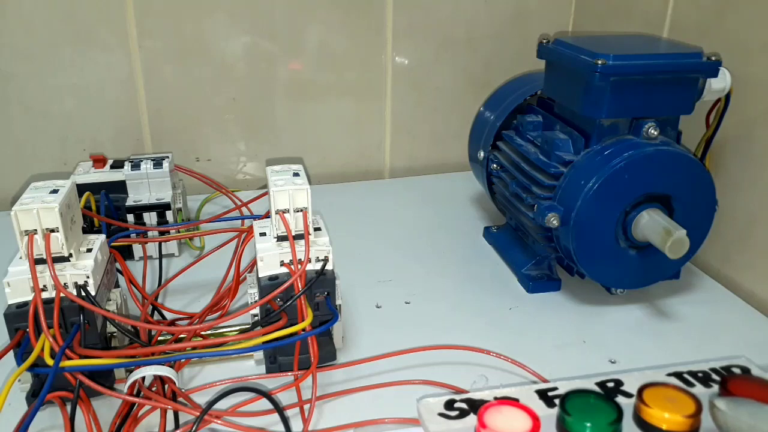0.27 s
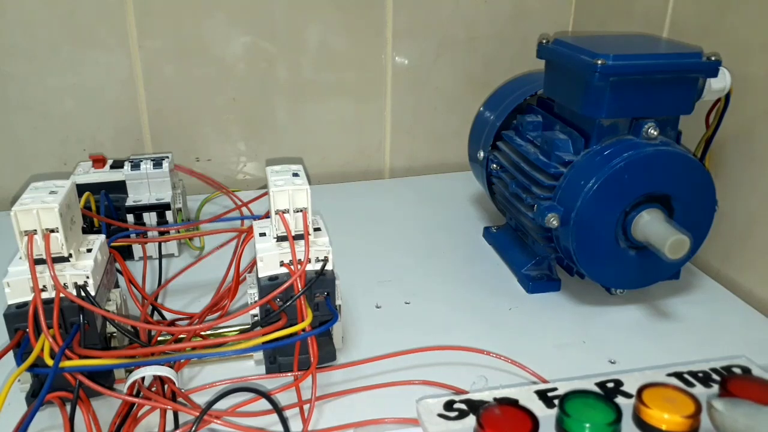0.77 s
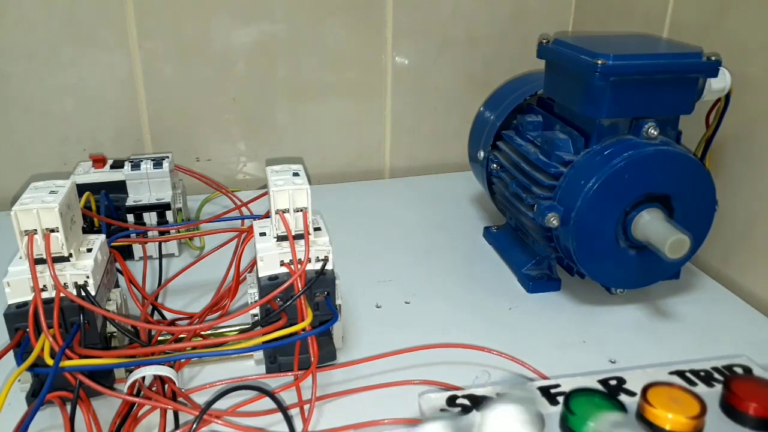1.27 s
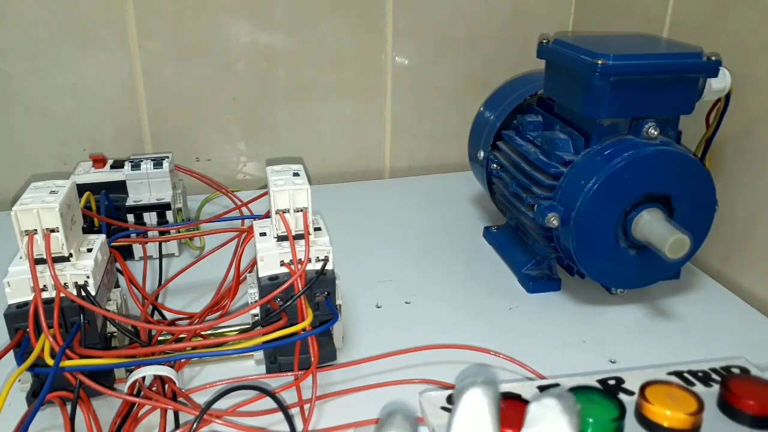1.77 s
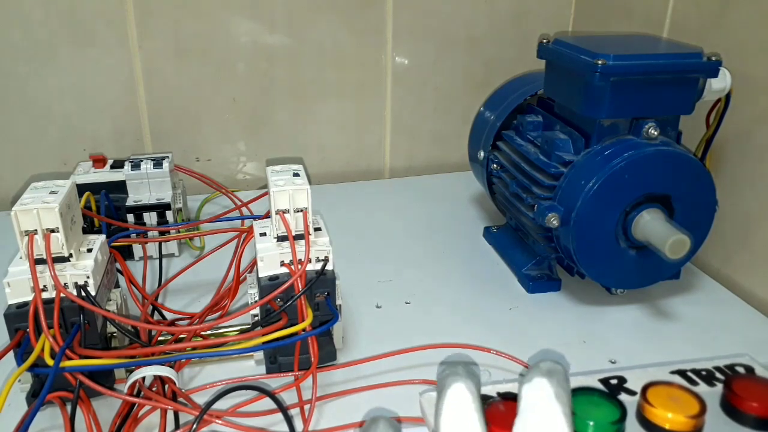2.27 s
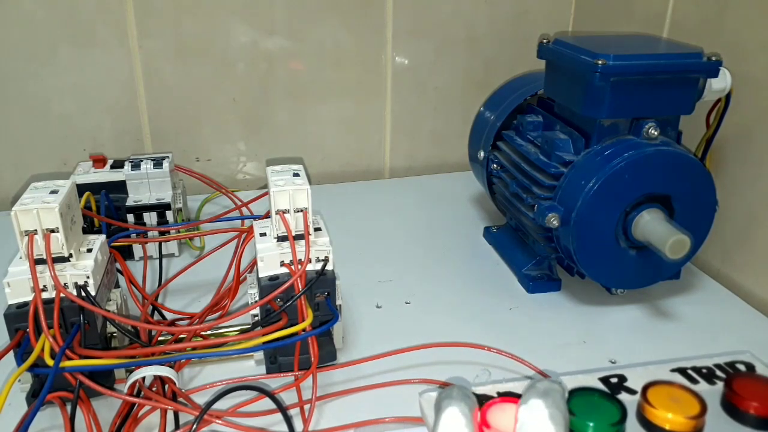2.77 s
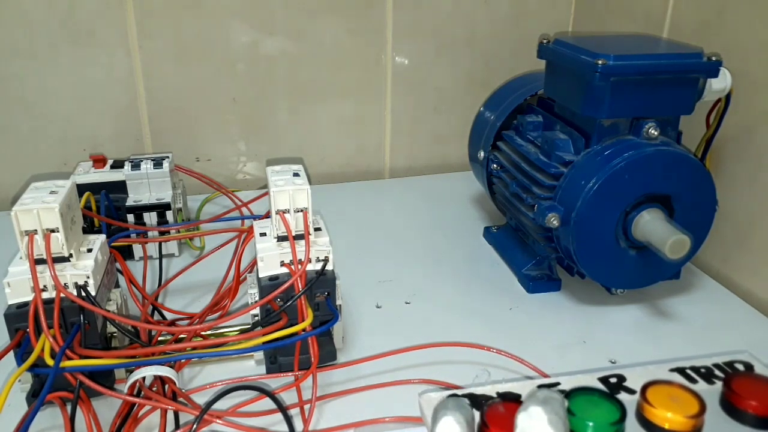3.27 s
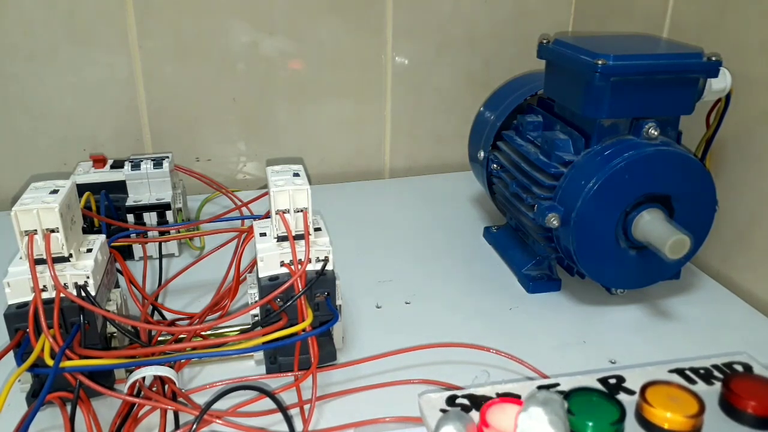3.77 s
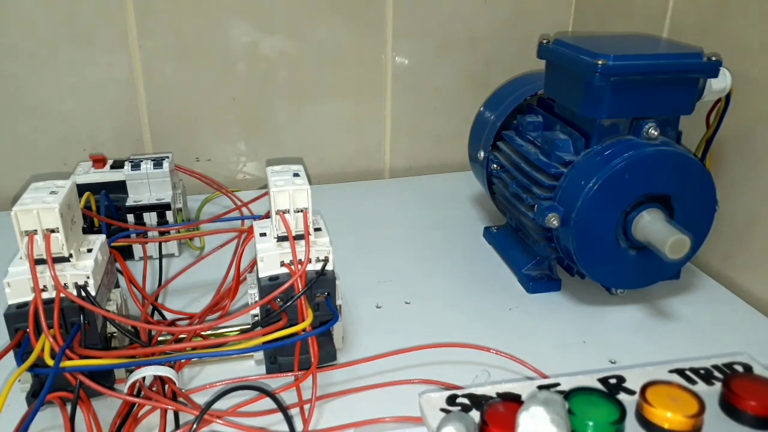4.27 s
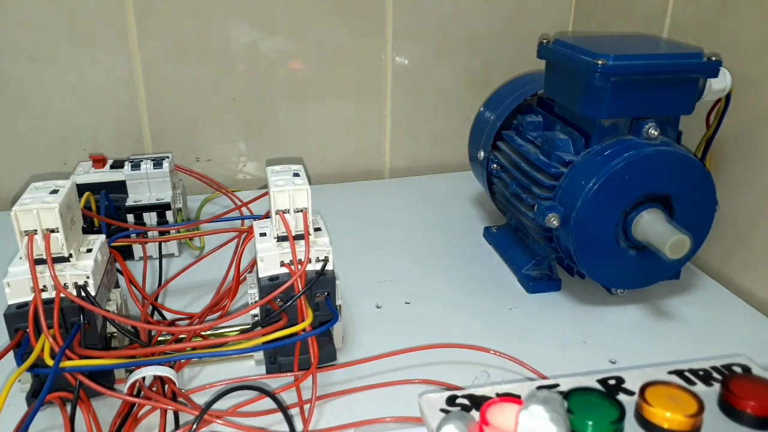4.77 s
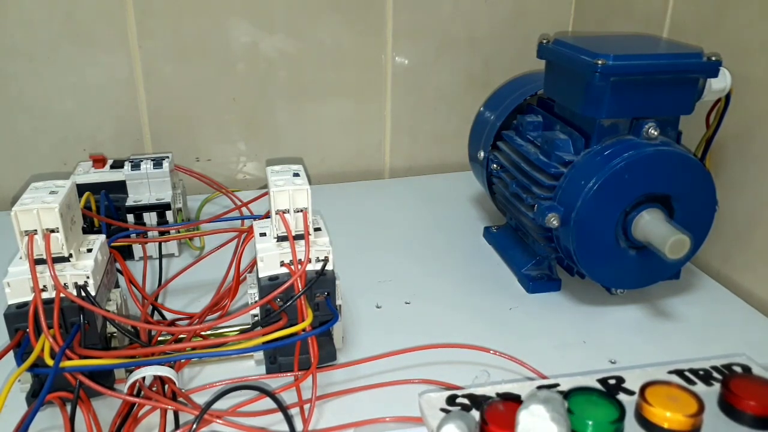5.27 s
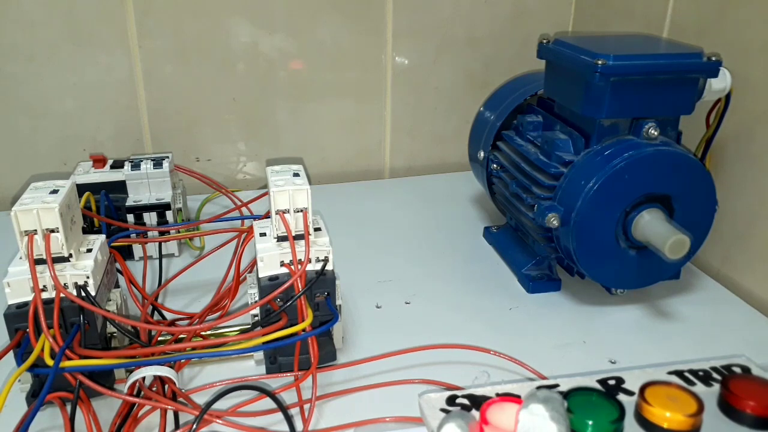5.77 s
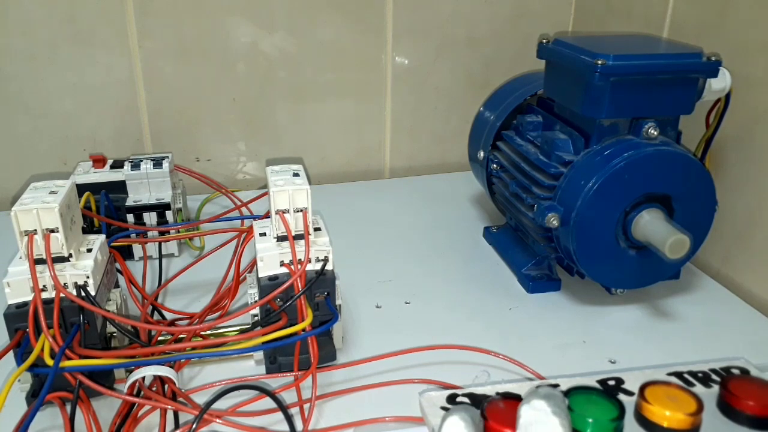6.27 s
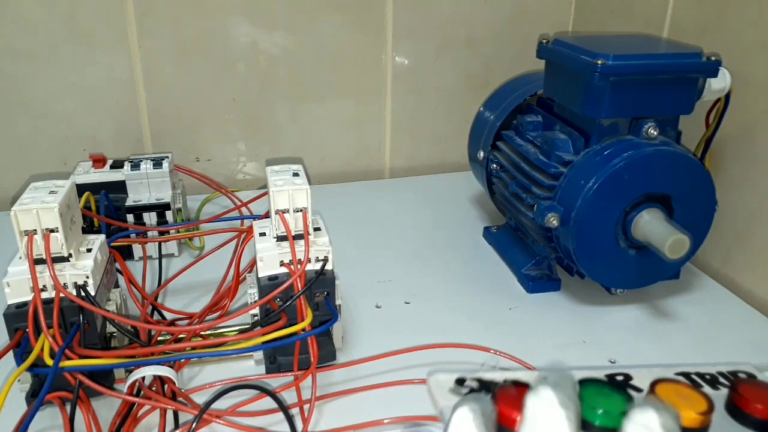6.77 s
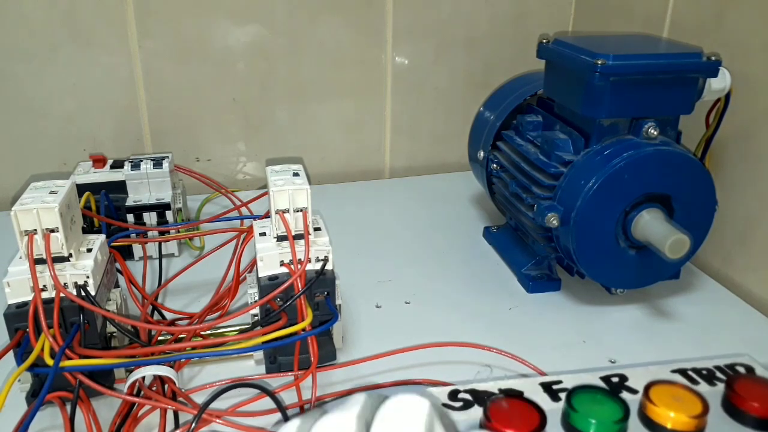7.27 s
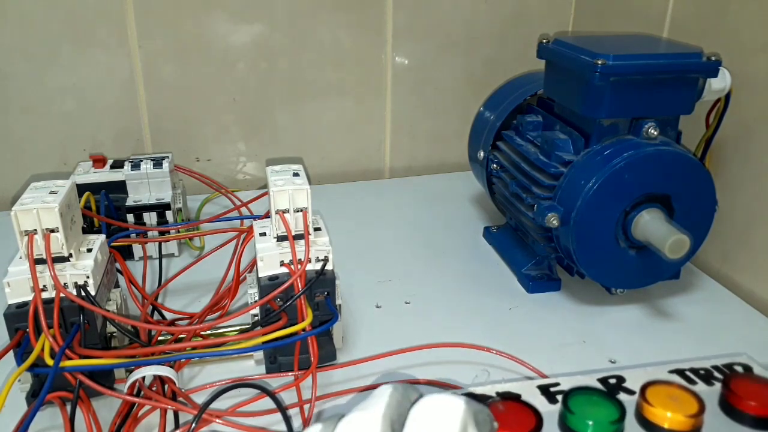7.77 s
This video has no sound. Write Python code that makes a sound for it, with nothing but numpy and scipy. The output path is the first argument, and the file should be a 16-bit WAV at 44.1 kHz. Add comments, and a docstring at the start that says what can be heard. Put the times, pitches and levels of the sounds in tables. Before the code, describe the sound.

Loud steel clacks of a relay switch start and stop a whining motor five times, with booming sheet metal and tiled-room echo.

```python
"""A tiled room hums quietly as a phone microphone fades in on a sheet-metal bench with a contactor and small motor.
First pull-in: steel cracks on steel, the bench booms, and the motor growls and thumps on its feet from rest.
It whines through a long run, with light plastic ticks, until a duller drop-out.
Three short runs follow, each started while the motor still coasts; a fifth start leads to a last long run.
After the final drop-out the coasting motor dies away. Lines, filtered noise and decaying modes make the sounds."""
import sys
import numpy as np
from scipy import signal
from scipy.fft import rfft, irfft
from scipy.io import wavfile
from scipy.ndimage import uniform_filter1d

SR = 44100
rng = np.random.default_rng(int(sys.argv[2]) if len(sys.argv) > 2 else 0)


def wav_out(sig):
    """Save sig, one row per channel (or a flat mono array), as 16-bit PCM at SR to the path in sys.argv[1]."""
    wavfile.write(sys.argv[1], SR, np.round(np.clip(np.atleast_2d(sig).T, -1, 1) * 32767).astype(np.int16))


N = 354078
TIME = np.arange(N) / SR
AGE = np.arange(SR // 2) / SR  # seconds since a blow

# Columns named level_db are relative wherever a function adds its own level.
# Quiet room tone: pitch_hz, level_db
ROOM_COLOUR = [(30, -6), (100, -3.5), (150, -1), (220, -2.5), (350, -5.5), (1000, -6.5), (1400, -12.5),
               (3000, -21), (8000, -32), (15500, -27.5)]
ROOM_DB = -62
# Decay of the tiled room: pitch_hz, t60_s
ROOM_DECAY = [(80, 0.31), (250, 0.37), (700, 0.24), (1500, 0.28), (4000, 0.32), (8000, 0.23), (15000, 0.2)]
# Light plastic ticks: start_s, level_db, pitch_hz, half_width_hz
PLASTIC_TICKS = [(1.052, -42.5, 4500, 3500), (1.736, -49, 12100, 2500), (2.218, -44, 5500, 4000),
                 (6.623, -45, 7000, 4500), (6.674, -46.5, 6000, 4000), (6.953, -48, 4000, 3000),
                 (7.253, -39, 7410, 900), (7.729, -51, 11010, 700)]

# Magnet closes: start_s, force_db, bench_boom_db, pole_zing_db
PULL_INS = [(0.7682, -.5, -16, -17.5), (3.1607, .3, -10.8, -25), (4.1860, .3, -13, -21),
            (5.0655, .8, -9, -38), (6.0293, -1.4, -12.5, -16.5)]
# Spring throws the armature back on its stop: start_s, crack_db, spring_ring_db
DROP_OUTS = [(2.8250, -12, -29.5), (3.6521, -10, -31.5), (4.6204, -13, -28.5), (5.5604, -11.5, -30.5),
             (7.8690, -12.5, -31.5)]

# Bearings and fan while fed: pitch_hz, level_db
FED_COLOUR = [(40, -22), (110, -5.5), (200, -11), (370, -5), (500, -7.5), (850, -6.5), (1200, -1),
              (1450, -7.5), (1950, -9), (2300, -12.5), (3050, -12.5), (3400, -21), (5500, -22.5),
              (9000, -33), (15500, -34.5)]
FED_NOISE_DB = -47
# Bearings and fan while coasting: pitch_hz, level_db
COAST_COLOUR = [(40, -11), (110, -11.5), (200, -2.5), (500, -4.5), (900, 1.5), (1400, -8), (2000, -4.5),
                (2400, -14), (3000, -6), (3400, -22), (5500, -26), (9000, -30.5), (15500, -31.5)]
# Rasp of the stator sheets: pitch_hz, half_width_hz, level_db
STATOR_PEAKS = [(770, 120, 2.5), (1053, 27, 4.5), (1820, 140, -6), (3010, 130, -14), (6440, 37, -24.5),
                (7150, 38, -21.5)]
# Level of the running motor, which dips shortly after the last start and recovers: time_s, level_db
RUNNING_LEVEL = [(5.9, 1), (6.45, -3.5), (6.9, 0)]

MAINS_HZ = 60
SHAFT_HZ, ROTOR_SLOTS = 29.87, 30  # turns per second at full speed
# Whine: slot tone, the pair split off it by the pulsing field, the outer pair from the rotor's wobble
SLOT_DB, PAIR_DB, WOBBLE_DB = -56.5, -49.6, -54.2
# The lower and upper sides slowly trade strength: period, a moment when the lower leads, depth
BEAT_S, LOWER_LEADS_S, BEAT_DB = 3.1, 1.37, 2.0
SIDE_TONE_DB = -5.5  # step to the side tones of the slot and wobble tones
FLUTTER_RAD = .15  # spread of the phase flutter, roughly
HUM_DB = -63.5  # hum of the iron
# Further magnetic tones of the frame at full speed: pitch_hz, level_db, side_tone_step_db
FRAME = [(859, -57, -20), (1761, -59, -8), (1791, -62, -10), (1809, -65, -15), (1954, -66, -10),
         (2082, -60.5, -6), (2670, -67.5, -2), (2794, -67.5, -10), (3037, -62, -3), (3585, -71, -9),
         (6390, -73, -9), (7079, -76, -12), (7165, -73, -12), (10869, -83, -6)]
# Thin tone that swells in the long runs: time_s, level_db
THIN_SWELL = [(1.3, -79), (1.65, -64), (2.15, -78), (6.7, -79.5), (7.1, -68), (7.5, -77)]
THIN_HZ = 4270  # at full speed

# Jolt of a start, from rest and with the shaft still turning: growl_db, knock_db, boom_db
REST_JOLT = (-22, -13, -23)
TURNING_JOLT = (-20, -9.6, -13.6)
# Time from pull-in, from rest and turning: growl_peak_s, landing_s
REST_DELAYS = (.033, .028)
TURNING_DELAYS = (.056, .098)
# Growl of the motor frame: pitch_hz, half_width_hz, level_db
GROWL_PEAKS = [(327, 25, 3), (387, 14, -2.5), (560, 26, -6.5), (717, 24, -1), (874, 46, -4.5),
               (1013, 41, 0)]
# Motor landing on the bench: pitch_hz, level_db
THUD_COLOUR = [(35, -32.5), (80, 2), (400, 4.5), (950, 1.5), (1300, -8), (2000, -17), (5000, -19),
               (9000, -26.5), (15500, -42)]
FOOT_HZ, FOOT_S = 560, .0055  # pitch and length of the foot's contact

# Bench top and rail: pitch_hz, t60_s before damping, pull_in_db, drop_out_db, motor_db
BENCH_MODES = [(108, 0.49, -9.5, -16.5, -13.5), (129.4, 0.38, 2, -6, -10), (153.7, 0.4, -2, -1, -21),
               (199.5, 0.32, -16.5, -3.5, -9.5), (245.3, 0.46, -12, -6, -5.5),
               (315.9, 0.36, -2.5, -3.5, -14.5), (362, 0.32, -5, -13, -3.5), (397, 0.41, -8.5, -15.5, -17),
               (416.3, 0.18, 0, -16.5, -8), (527, 0.21, -17, -9.5, -12.5), (567, .3, -6.5, -7.5, -5),
               (616, 0.28, -8, -2, -9.5), (659, 0.28, -21, -4.5, -5), (740, 0.37, -25, -28, -6.5),
               (860, 0.24, -11, -28, -7), (948, 0.2, -18, -20, -8.5), (982, .3, -16, -28, -16.5),
               (1222, 0.34, -15, -14, -14), (1285, 0.33, -18.5, -8.5, -19.5), (1476, 0.26, -37, -19, -23),
               (1510, 0.41, -19.5, -22.5, -20)]
# Armature hitting its stop: pitch_hz, level_db
OPEN_CRACK_COLOUR = [(300, -1), (700, 0.5), (1400, 1.5), (2200, -16), (3800, -10.5), (6500, -9.5),
                     (8700, -6), (9600, -19), (15500, -13)]
# Housing under a drop-out: pitch_hz, level_db
OPEN_HOUSING_COLOUR = [(30, -45), (80, -3), (550, 1.5), (850, -6), (1300, -3), (2100, -15), (2900, -9.5),
                       (4500, -16), (5100, -12.5), (6200, -15), (8700, -14), (9400, -27), (11000, -19),
                       (15500, -26.5)]
# Return spring and contact bridges: pitch_hz, half_width_hz, level_db
SPRING_PEAKS = [(2454, 24, 6), (2900, 44, -2.5), (3713, 37, 7), (4360, 30, -8), (5120, 46, -2),
                (6830, 30, -10.5), (8800, 58, -10)]
# The spring's force is the same at every drop-out
OPEN_HOUSING_DB, OPEN_BENCH_DB, SCRAPE_DB = -16, -15, -19.5

# Steel meeting steel, also sliding and scraping contacts: pitch_hz, level_db
CLOSE_CRACK_COLOUR = [(300, 3.5), (1500, -4), (3000, -3), (4800, 0), (6500, -1.5), (8500, 1), (9500, -6),
                      (12000, -7.5), (15500, -14.5)]
# Housing under a pull-in: pitch_hz, level_db
CLOSE_HOUSING_COLOUR = [(35, -37), (85, 1), (400, -2.5), (1000, -5.5), (1700, -4), (2100, -8), (2500, -8),
                        (3500, -12.5), (4800, -12.5), (7000, -16), (8500, -10), (9400, -22), (12500, -17),
                        (15500, -24)]
# Laminated steel core: pitch_hz, half_width_hz, level_db
CORE_PEAKS = [(1492, 15, 0), (2338, 20, -6), (2710, 26, -2.5), (4437, 29, 1.5), (4980, 60, 2.5),
              (5460, 50, -6), (7460, 110, -4.5), (8570, 60, -6)]
# Pole faces meeting edge first: pitch_hz, half_width_hz, level_db
POLE_PEAKS = [(5790, 120, -1.5), (6024, 45, -2.5), (6330, 55, 0.5), (10440, 110, -9)]
# Parts of a pull-in at force 0 dB
CLOSE_CRACK_DB, CLOSE_HOUSING_DB, CORE_DB = -10.7, -15.1, -24.5


def undb(db):
    """Decibels to gain."""
    return 10 ** (np.asarray(db) / 20)


def unit(x):
    """Scale to rms 1."""
    return x / np.sqrt(np.mean(x ** 2))


def shape(x, points):
    """Colour x by (Hz, dB) points, joined along log frequency; rms 1."""
    hz, db = np.transpose(points)
    f = np.fft.rfftfreq(len(x), 1 / SR) + 1  # +1 avoids log(0)
    gain = undb(np.interp(np.log(f), np.log(hz), db))
    return unit(irfft(rfft(x) * gain, len(x)))


def resonate(x, peaks):
    """Pass x through (Hz, half width Hz, dB) resonances with steep skirts; rms 1."""
    f = np.fft.rfftfreq(len(x), 1 / SR)
    gain = sum(undb(db) / (1 + ((f - hz) / width) ** 2) for hz, width, db in peaks)
    return unit(irfft(rfft(x) * gain, len(x)))


def noise(size=len(AGE)):
    """White noise."""
    return rng.standard_normal(size)


def walk(rate):
    """Smooth random drift with a spread near 1, through `rate` knots per second."""
    knots = noise(size=512)
    drift = np.interp(TIME * rate, np.arange(512), knots)
    return uniform_filter1d(drift, int(SR / rate / 2)) * 1.3


def add(out, s, x):
    """Mix x into out at time s."""
    i = int(s * SR)
    out[i:i + len(x)] += x[:N - i]


def burst(x, length):
    """A short contact: x swells and dies within length seconds."""
    return x * np.sin(np.pi * np.minimum(AGE / length, 1)) ** 2


def die_away(t60):
    """Exponential decay by 60 dB in t60 seconds."""
    return np.exp(-np.log(1000) * AGE / t60)


def ring_out(x, build):
    """Reflections pile up over build seconds, while each band dies at the room's rate."""
    hz, t60 = np.transpose(ROOM_DECAY)
    log_f = np.log(np.fft.rfftfreq(len(x), 1 / SR) + 1)
    spectrum = rfft(x)
    tail = 0
    for pick, band_t60 in zip(np.eye(len(hz)), t60):  # overlapping triangular bands
        band = irfft(spectrum * np.interp(log_f, np.log(hz), pick), len(x))
        tail = tail + band * die_away(band_t60)
    return tail * (1 - np.exp(-AGE / build))


def path_noise(path, fresh=0.62):
    """The same echo pattern for each blow from one spot, altered by how the parts bounce."""
    return path + fresh * noise()


def bench(drive_db, phases, build, damping=0.97, scatter_db=1.0, detune=.003):
    """The bench's modes after one blow; no two blows share their strength quite alike."""
    hz, t60 = np.array(BENCH_MODES)[:, :2].T
    size = undb(drive_db + scatter_db * noise(size=len(hz))) / np.linalg.norm(undb(drive_db))
    hz = hz * (1 + detune * noise(size=len(hz)))
    swings = np.sin(2 * np.pi * (np.outer(AGE, hz) + phases))
    decays = np.exp(-np.log(1000) * np.outer(AGE, damping / t60))
    return np.sqrt(2) * (swings * decays) @ size * (1 - np.exp(-AGE / build))


def room_tone():
    """The quiet room: coloured noise that drifts slightly in level."""
    return undb(ROOM_DB + 0.43 * walk(4.9)) * shape(noise(size=N), ROOM_COLOUR)


def plastic_ticks():
    """Light, dry plastic ticks with a faint room tail."""
    out = np.zeros(N)
    for s, db, hz, width_hz in PLASTIC_TICKS:
        tick = resonate(noise(), [(hz, width_hz, 0)])
        dry_tick = tick * np.exp(-AGE / 0.0023)
        tail = undb(-18) * ring_out(tick, build=.003)
        add(out, s, undb(db) * (dry_tick + tail))
    return out


def drive(run_up=.03, coast=1.2, field_decay=0.019):
    """Magnetic field and shaft speed (0-1) approach full and die exponentially; time constants in s."""
    field, speed = np.zeros(N), np.zeros(N)
    for on, off in zip(PULL_INS, DROP_OUTS):
        fed, free = TIME >= on[0], TIME >= off[0]
        field[fed] = 1 - np.exp(-(TIME[fed] - on[0]) / run_up)
        speed[fed] = 1 - (1 - speed[fed][0]) * (1 - field[fed])  # picks up from the coasting speed
        field[free] = np.exp(-(TIME[free] - off[0]) / field_decay)
        speed[free] = np.exp(-(TIME[free] - off[0]) / coast)
    return field, speed


def whine(spin, waver_db=1.1, count=3):
    """Rotor slots pass the stator; the field splits their tone by twice the mains, the wobble by one more turn."""
    def tone(hz, db):
        """A wavering sine whose pitch follows the shaft; hz at full speed."""
        level = undb(db + waver_db * walk(1.996))
        return level * np.sin(2 * np.pi * (hz * spin + rng.random()) + FLUTTER_RAD * walk(25))

    slot_hz = ROTOR_SLOTS * SHAFT_HZ
    beat_db = BEAT_DB * np.cos(2 * np.pi * (TIME - LOWER_LEADS_S) / BEAT_S)
    total = tone(2 * MAINS_HZ, HUM_DB) + tone(THIN_HZ, np.interp(TIME, *np.transpose(THIN_SWELL)))
    tones = [(slot_hz, SLOT_DB, SIDE_TONE_DB), *FRAME]
    for side in (-1, 1):  # below and above the slot tone
        total += tone(slot_hz + side * 2 * MAINS_HZ, PAIR_DB - side * beat_db)
        wobble_hz = slot_hz + side * (2 * MAINS_HZ + SHAFT_HZ)
        tones.append((wobble_hz, WOBBLE_DB - side * beat_db, SIDE_TONE_DB))
    for hz, db, step_db in tones:
        for k in range(count):  # the tone, then side tones one mains frequency apart below it
            total += tone(hz - k * MAINS_HZ, db + k ** 1.5 * step_db)
    return np.sqrt(2) * total


def motor(rasp_db=-53.5):
    """Whine, rasp and loaded bearings follow the field; coasting noise follows the shaft, partly repeating every turn."""
    field, speed = drive()
    spin = np.cumsum(speed * (1 + 0.00044 * walk(5))) / SR  # seconds' worth of full-speed turning
    throb = 1 + 0.3 * np.sin(2 * np.pi * 2 * MAINS_HZ * TIME)
    rasp = undb(rasp_db) * resonate(noise(size=N), STATOR_PEAKS) * throb
    turn = noise(size=int(SR / SHAFT_HZ))
    rolling = turn[(spin * SHAFT_HZ % 1 * len(turn)).astype(int)]  # one pattern per turn
    loaded = undb(FED_NOISE_DB) * shape(noise(size=N) + .4 * rolling, FED_COLOUR)
    free = undb(-48.5) * shape(noise(size=N) + .5 * rolling, COAST_COLOUR)
    running_gain = undb(np.interp(TIME, *np.transpose(RUNNING_LEVEL)))
    fed = running_gain * field * (whine(spin) + rasp + loaded * undb(0.35 * walk(12)))
    return fed + (1 - field) * speed * free


def jolts():
    """Each pull-in with its jolt: the first finds the motor at rest, the later ones find it coasting."""
    first, *later = (row[0] for row in PULL_INS)
    return [(first, REST_DELAYS, REST_JOLT)] + [(s, TURNING_DELAYS, TURNING_JOLT) for s in later]


def inrush(rise=0.013, fall=0.042, throb=0.44):
    """The heavy starting current shakes the motor frame twice per mains cycle, in a growl that swells and dies."""
    level = np.zeros(N)
    for start, (delay, _), (growl_db, _, _) in jolts():
        past_peak = TIME - start - delay
        level += undb(growl_db) * np.exp(np.minimum(past_peak / rise, -past_peak / fall))
    shaking = 1 + throb * np.sin(2 * np.pi * 2 * MAINS_HZ * TIME)
    return level * resonate(noise(size=N), GROWL_PEAKS) * shaking


def thumps():
    """The heavy motor lands on the bench: a soft contact of a few swings, with little treble."""
    out, path, phases = np.zeros(N), noise(), rng.random(len(BENCH_MODES))
    drive_db = np.array(BENCH_MODES)[:, 4]
    for start, (_, delay), (_, knock_db, boom_db) in jolts():
        s = start + delay
        knock = burst(np.sin(2 * np.pi * FOOT_HZ * AGE), length=FOOT_S)
        add(out, s - .001, undb(knock_db) * knock)
        thud = undb(-2.5) * ring_out(shape(path_noise(path), THUD_COLOUR), build=.001)
        modes = undb(-6.5) * bench(drive_db, phases, build=0.0023)
        add(out, s, undb(boom_db) * (thud + modes))
    return out


def drop_outs(travel=.0065, spring_t60=0.35):
    """The contacts scrape apart, then the armature knocks against the plastic housing and the spring rings on."""
    out, path, phases = np.zeros(N), noise(), rng.random(len(BENCH_MODES))
    drive_db = np.array(BENCH_MODES)[:, 3]
    for s, crack_db, spring_db in DROP_OUTS:
        scrape = burst(shape(noise(), CLOSE_CRACK_COLOUR), length=0.011)
        add(out, s - travel - .002, undb(SCRAPE_DB) * scrape)
        crack = burst(shape(noise(), OPEN_CRACK_COLOUR), length=0.0091)
        add(out, s - .001, undb(crack_db) * crack)
        housing = ring_out(shape(path_noise(path), OPEN_HOUSING_COLOUR), build=0.0031)
        add(out, s, undb(OPEN_HOUSING_DB) * housing)
        add(out, s, undb(OPEN_BENCH_DB) * bench(drive_db, phases, build=0.0011, damping=1.18))
        add(out, s, undb(spring_db) * resonate(noise(), SPRING_PEAKS) * die_away(spring_t60))
    return out


def pull_ins(travel=.0092):
    """The coil snatches the armature, which slides for a moment and slams on the core."""
    out, path, phases = np.zeros(N), noise(), rng.random(len(BENCH_MODES))
    drive_db = np.array(BENCH_MODES)[:, 2]
    for s, force_db, bench_db, zing_db in PULL_INS:
        snatch = undb(-29.5) * shape(noise(), CLOSE_HOUSING_COLOUR) * np.exp(-AGE / 0.0067)
        recoil = undb(-22.5) * np.sin(2 * np.pi * 150 * AGE) * np.exp(-AGE / 0.011)
        slide = undb(-25) * burst(shape(noise(), CLOSE_CRACK_COLOUR), length=0.024)
        add(out, s - travel, snatch + recoil + slide)
        core = undb(CORE_DB + 2 * force_db) * resonate(path_noise(path), CORE_PEAKS)
        steel = core + undb(zing_db) * resonate(path_noise(path), POLE_PEAKS)
        crack = undb(CLOSE_CRACK_DB + force_db) * shape(noise(), CLOSE_CRACK_COLOUR)
        add(out, s - .001, burst(crack + 2 * steel, length=0.0069))
        housing = undb(CLOSE_HOUSING_DB + force_db) * shape(path_noise(path), CLOSE_HOUSING_COLOUR)
        add(out, s, ring_out(housing + steel, build=0.013))
        add(out, s, undb(bench_db) * bench(drive_db, phases, build=.005))
    return out


def scene():
    """Switchgear and motor over the quiet room, in one channel."""
    background = room_tone() + plastic_ticks()
    machine = motor() + inrush() + thumps()
    contactor = drop_outs() + pull_ins()
    return (background + machine + contactor)[None]


def record(dry):
    """The phone microphone fades in, thins the deep bass, rounds the highest peaks and cuts the top."""
    fade = np.clip((TIME - .12) / 0.083, 0, 1) ** 2
    bass_cut = signal.butter(2, 50, "high", fs=SR, output="sos")
    thinned = signal.sosfilt(bass_cut, dry * fade)
    rounded = 1.3 * np.tanh(thinned / 1.3)
    top_cut = signal.ellip(8, .2, 70, 15600, fs=SR, output="sos")
    return signal.sosfilt(top_cut, rounded)


dry = scene()
out = record(dry)
wav_out(out)
```